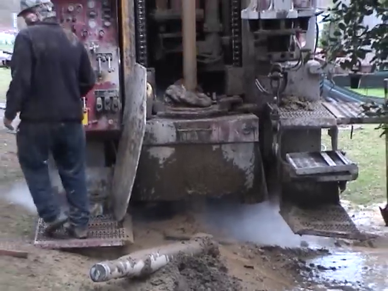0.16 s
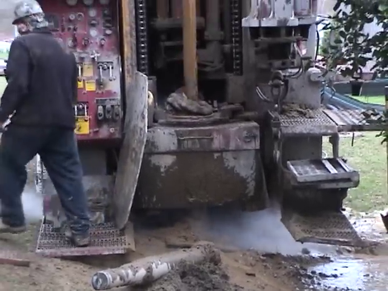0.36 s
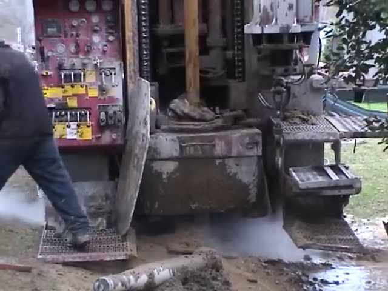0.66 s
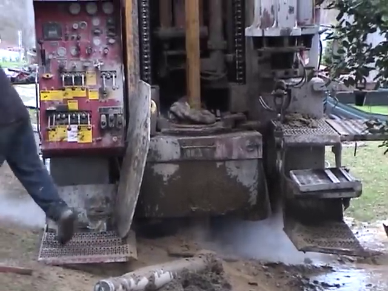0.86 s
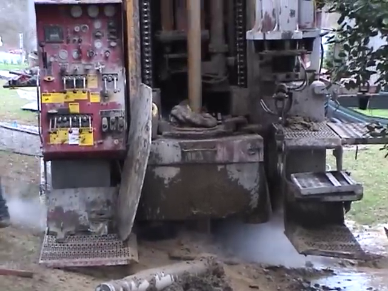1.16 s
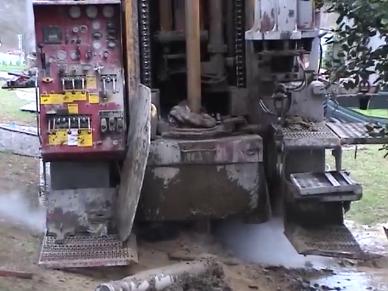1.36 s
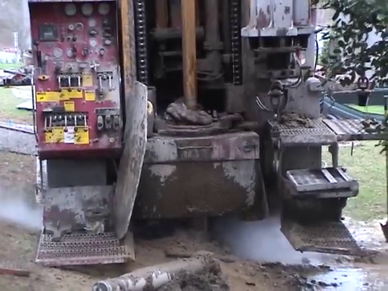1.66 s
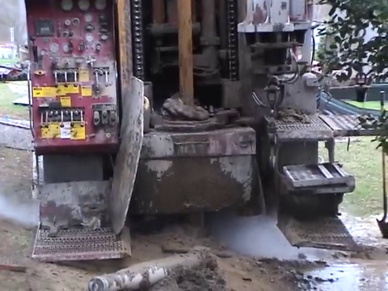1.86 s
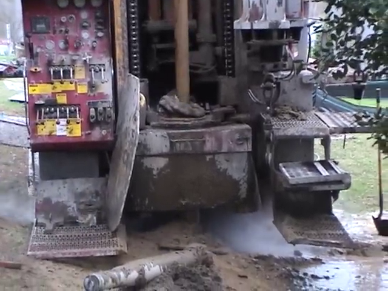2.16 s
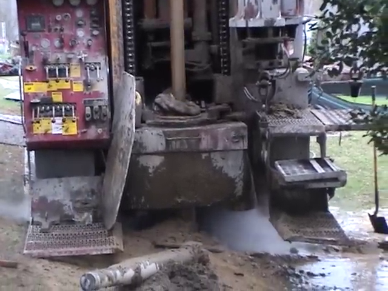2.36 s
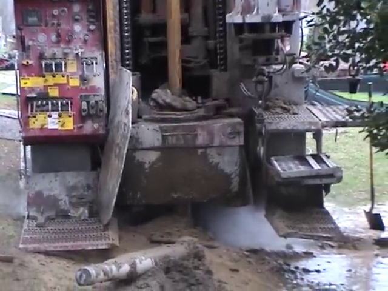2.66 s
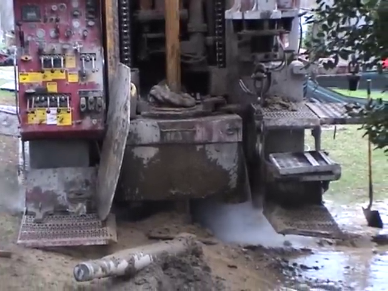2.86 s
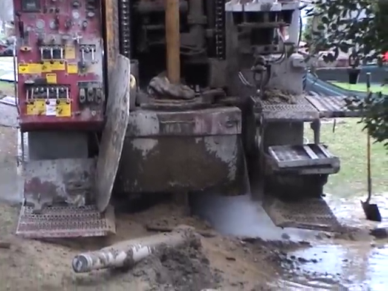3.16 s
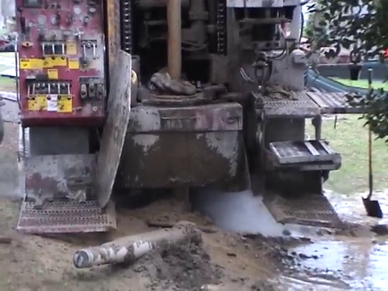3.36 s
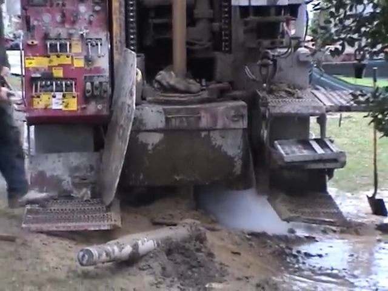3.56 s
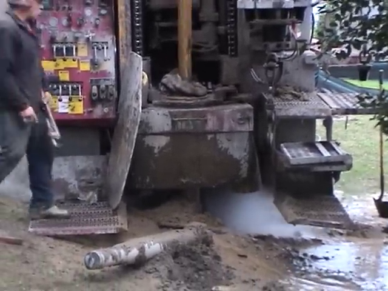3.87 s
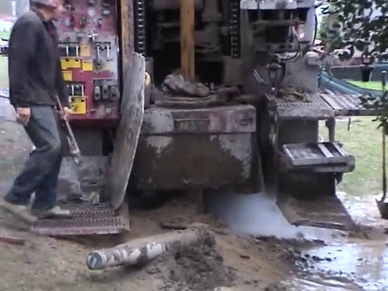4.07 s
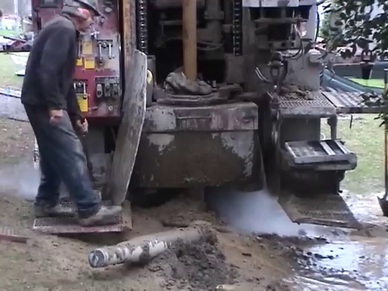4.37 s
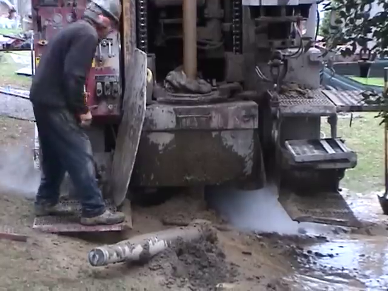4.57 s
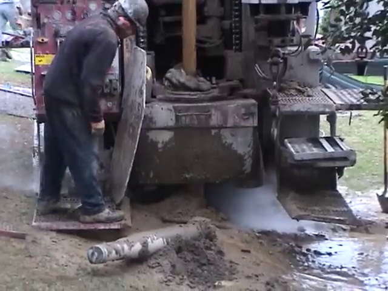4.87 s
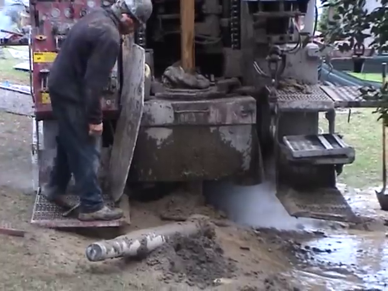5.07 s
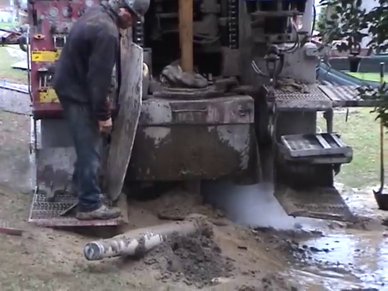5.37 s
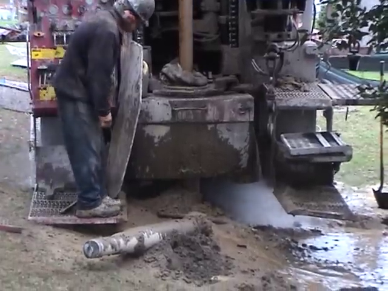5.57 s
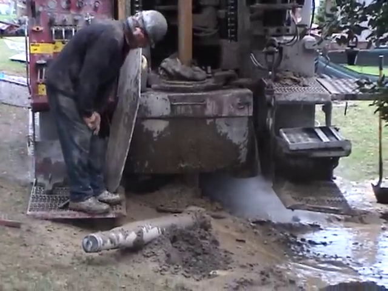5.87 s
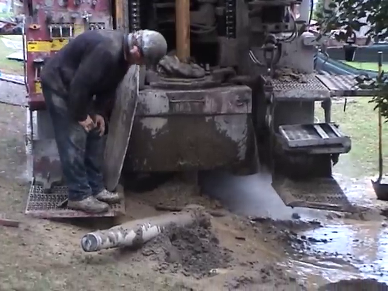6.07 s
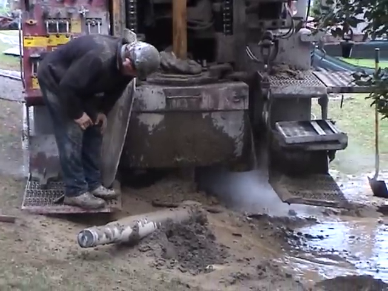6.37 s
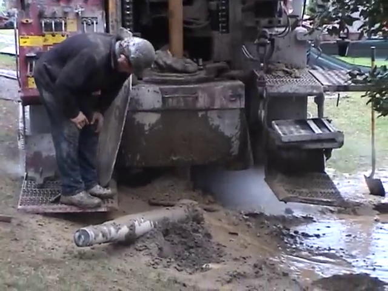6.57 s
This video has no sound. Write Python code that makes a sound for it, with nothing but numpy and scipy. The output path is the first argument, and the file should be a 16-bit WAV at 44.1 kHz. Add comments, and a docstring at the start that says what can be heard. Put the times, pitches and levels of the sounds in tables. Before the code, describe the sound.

Loud, fast steel hammering, over twenty blows a second, with singing pipe tones, blasting air, brief pings and thin squeals, heard on the left only.

```python
"""A truck-mounted rig drills a well with an air hammer that quickens from about 21 to over 22 blows a second.
From the start, bursts of reflections and decaying modes make each blow clank and return as an echo, while
wavering sines keep the pipe singing; shaped noise hisses from the hole over a faint engine sine.
Loose steel pings and resonances swell in spells; squeals soon join as slightly wavering sines, and dull
thuds later as short low pulses. Only the left channel carries sound."""
import sys
import numpy as np
from scipy import signal
from scipy.fft import rfft, irfft, next_fast_len
from scipy.io import wavfile
from scipy.ndimage import uniform_filter1d, minimum_filter1d, map_coordinates

SR = 44100
rng = np.random.default_rng(int(sys.argv[2]) if len(sys.argv) > 2 else 0)


def generate_wav(signal):
    """Clip the signal to [-1, 1] and save it as 16-bit WAV at the path in sys.argv[1]."""
    frames = np.transpose(np.atleast_2d(signal))
    scaled = np.clip(frames, -1, 1) * 32767
    pcm = np.round(scaled).astype(np.int16)
    wavfile.write(sys.argv[1], SR, pcm)


N = 296352
CLOCK_S = np.arange(N) / SR

# All table levels are relative; the functions set the balance between layers.
# hammer speed: time_s, rate_blows_per_s
HAMMER_RATE = [(0, 21.03), (.96, 21.06), (1.2, 20.56), (1.44, 21.22), (2.88, 21.54), (5.76, 22.18),
               (6, 22.01), (6.72, 22.6)]
# clank strength as the bit meets harder and softer rock: time_s, low_clank_db, pipe_ring_db, bright_clank_db
CLANK_LEVELS = [(0.0, -29, -28, -27), (0.21, -23, -21.5, -29.5), (0.3, -29.5, -30.5, -28),
                (0.68, -28.5, -24, -28.5), (0.87, -32, -26, -31), (0.97, -27.5, -22.0, -28.5),
                (1.06, -26.5, -27, -28), (1.35, -29.5, -24, -28.5), (1.54, -26.5, -28, -30),
                (1.73, -28.5, -32, -29.5), (2.01, -28, -24.5, -26), (2.1, -31.5, -29, -26),
                (2.57, -31, -30, -34), (2.76, -25, -28, -26), (3.22, -26, -23, -30.5),
                (3.31, -29.5, -27, -32), (3.5, -31, -28, -27), (3.68, -29, -24.5, -30),
                (3.87, -27, -36, -26.5), (3.96, -26.5, -24, -27.5), (4.32, -30.5, -27.5, -23),
                (4.42, -30.5, -22, -25.5), (4.51, -32.5, -28, -25.5), (4.6, -35, -26, -26.5),
                (4.78, -30, -28.5, -25.0), (5.05, -32.5, -37, -28.5), (5.14, -26.5, -22.5, -28.5),
                (5.24, -35, -34, -21.5), (5.33, -26.5, -24, -27), (5.42, -34.5, -29.0, -25),
                (5.6, -32.5, -30, -24.0), (5.78, -31, -25, -28.5), (6.14, -28.5, -29.5, -27.5),
                (6.23, -34, -32, -29.5), (6.32, -29, -24.5, -26.5), (6.72, -31, -30, -25)]
# blows harder or softer than their neighbours: time_s, low_clank_extra_db, bright_clank_extra_db
ODD_BLOWS = [(0.11, 0.5, 1), (0.49, 3.5, 1.5), (0.59, -0.5, -2.5), (1.16, -4, -3), (1.3, -2, -3.5),
             (1.54, 1, 0.5), (1.59, -4, -3), (1.63, 1.5, -1.0), (1.68, -4, 2.0), (1.87, 3, 1.0),
             (2.15, -0.5, -2), (2.24, 0, 4.5), (2.29, -6.5, -6), (2.34, 2.5, -1), (2.38, -1, -4),
             (2.52, 1.5, 3), (2.62, 0.5, 3), (2.85, -2, -2.5), (2.9, -1.5, 2), (3.13, -1, 4),
             (3.17, -2, 3.5), (3.36, -1.5, -4), (3.45, 1, 2), (3.54, -2.5, -4), (3.68, -0.5, -1.5),
             (3.82, 2.5, 1.5), (4.0, 0.5, 3.5), (4.1, -3, 0.5), (4.64, 2, 0.5), (4.83, 2.5, -2),
             (4.92, 0, 2), (4.96, -4, -8), (5.1, 2, 2.0), (5.24, 3, -5), (5.55, 0, 1), (5.91, -2.5, 0),
             (6.0, 0.0, 3), (6.09, -1, -2), (6.19, 3, -0.5), (6.63, -2.0, 0)]
# second burst of the double low clank: time_s, extra_db
SECOND_PASS_LEVELS = [(0, -1), (2.9, -0.5), (4.6, 3), (5.2, -2.5), (6.72, 0)]
# passes of a blow at the top of the pipe, then its echo: delay_s, gaussian_width_s, level_db
PIPE_PASSES = [(-.0066, .0018, 1.5), (-.0008, .0028, -1), (.021, .005, -7)]
# modes the blows keep ringing in the pipe, low and middle: pitch_hz, level_db
LOW_PIPE_MODES = [(378, -15.5), (585, -7), (600, -7), (693, -9.5), (835, -4.5), (910, -1), (940, -1),
                  (1015, -1)]
MIDDLE_PIPE_MODES = [(1206, -7.5), (1315, -1.5), (1356, 4), (1402, 0), (1458, -1), (1509, 1), (1563, -10),
                     (1615, -5.5), (2065, 0), (2250, -1.5)]
# modes of the frame: pitch_hz, level_db, t60_s
FRAME_MODES = [(2335, -4, .07), (2570, -7, .12), (2780, 6, .0091), (2865, 5, .043), (2930, 1, .06),
               (3070, -12, .18), (3290, -13, .14), (3430, 2.5, .05), (3485, -1, .07), (3620, -6, .09),
               (3745, -9, .11)]
# modes of the steel drill table: pitch_hz, level_db, t60_s
TABLE_MODES = [(3980, 0, .046), (4035, -8, .12), (4140, -5, .067), (4335, -6, .08), (4415, -5, .08),
               (4520, 0, .036), (4785, -10, .11), (4860, -11, .08), (5110, -13, .14), (5280, -6, .055)]
# ringing of the drill table: time_s, level_db
TABLE_LEVELS = [(0.0, -33.5), (0.3, -30), (0.59, -36.5), (0.87, -28.5), (0.97, -37), (1.16, -26.5),
                (1.45, -33.5), (2.01, -29), (2.1, -36), (2.57, -29.5), (3.31, -38), (3.77, -32),
                (4.05, -35), (4.96, -29), (6.59, -35), (6.72, -22)]
# filter responses of the two clanks: frequency_hz, response_db
LOW_CLANK_RESPONSE = [(150, -62), (330, -37), (520, -39), (740, -7.5), (900, 4.5), (1130, -1), (1400, 0),
                      (1900, 5.5), (2300, -18), (3000, -50)]
BRIGHT_CLANK_RESPONSE = [(1200, -14.5), (2000, -1), (2400, 9), (2900, 5.5), (3800, -4), (4300, 2.5),
                         (5300, 1.5), (7000, -16), (12000, -72)]
# two strongest clusters of pipe modes: pitch_hz, level_db
LOWER_TONE_MODES = [(1742, -13), (1759, 0), (1778, -6), (1798, -4)]
UPPER_TONE_MODES = [(1905, -10), (1930, -2), (1955, -7), (1972, 0), (2018, -7)]
# moments when a cluster sings out or sinks: centre_s, half_length_s, extra_db
LOWER_TONE_SURGES = [(-0.0, 0.04, -1), (0.15, 0.027, -4.0), (0.287, 0.03, -4.5), (0.62, 0.19, 2),
                     (1.431, 0.024, -5), (1.62, 0.06, -1), (2.012, 0.13, 4.0), (2.449, 0.05, -8),
                     (2.52, 0.046, 3.5), (2.783, 0.067, -12), (3.147, 0.083, 3), (3.491, 0.07, -4.5),
                     (3.623, 0.033, 4.0), (4.148, 0.098, 3.5), (4.48, 0.067, -13), (4.543, 0.29, 7.5),
                     (4.777, 0.03, -10.5), (4.867, 0.073, 5.5), (5.81, 0.03, 5), (5.89, 0.03, -4),
                     (6.225, 0.13, -6.5), (6.55, 0.08, 1.5)]
UPPER_TONE_SURGES = [(0.03, 0.21, 1.5), (0.33, 0.091, -4.5), (0.84, 0.07, -8), (1.12, 0.3, 4.5),
                     (1.48, 0.21, -6), (1.89, 0.039, -11), (2.4, 0.07, 3), (2.52, 0.04, -10),
                     (2.84, 0.061, -9), (2.96, 0.11, 3), (3.27, 0.052, 4.5), (3.91, 0.037, -7),
                     (4.07, 0.085, 3.5), (4.57, 0.03, -8), (4.791, 0.037, -10), (4.95, 0.062, -5),
                     (5.27, 0.09, -4), (5.63, 0.04, -4), (5.76, 0.082, 4), (5.9, 0.049, -9),
                     (6.14, 0.14, 3.0), (6.2, 0.06, -5)]
# chatter of the pipe in its guide: time_s, level_db
CHATTER_LEVELS = [(0, -34.5), (.28, -36), (.5, -34), (1.5, -34), (2.05, -36.5), (2.52, -31.5), (2.75, -37),
                  (3.25, -39), (3.5, -30.5), (3.92, -36.5), (4.34, -35.5), (4.6, -32), (5.04, -33.5),
                  (5.6, -32.5), (6.72, -33)]
# blows that chatter harder: time_s, extra_db
CHATTER_ACCENTS = [(0.287, 8.5), (0.334, 9), (0.381, 7), (0.77, 4), (3.545, 3), (4.49, 3), (4.54, 3.5),
                   (6.58, 3), (2.465, 3), (4.814, 5), (4.953, 9), (5.043, 11.5), (5.904, 7), (6.222, 7.5)]
# filter response of the rasp: frequency_hz, response_db
RASP_RESPONSE = [(3500, 3.5), (5300, 0.5), (7200, 9.5), (7600, 6), (8100, 2.5), (9400, 6), (10000, -4.5),
                 (11500, -1), (12300, -28), (14500, -39)]
# thin high pipe modes: pitch_hz, level_db
SHRILL_MODES = [(5500, -52), (5566, -46), (5640, -52), (5870, -51), (5954, -43), (6062, -47), (6180, -54),
                (6331, -48), (6440, -51), (6530, -51), (6590, -54), (6675, -47), (6820, -51), (6912, -46.5),
                (7020, -45.5), (7284, -47), (7388, -43.5), (7425, -48), (7705, -56), (7820, -55),
                (8570, -56), (8642, -53), (8800, -58), (8975, -53), (9270, -56), (9340, -50.5), (9450, -56),
                (9610, -57), (9830, -60), (11520, -60)]
# air and spray leaving the hole: time_s, level_db
AIR_LEVELS = [(0, -25), (2.17, -26), (2.55, -24.5), (3.1, -26.5), (3.6, -24.5), (4.08, -26), (5.03, -25.5),
              (6.72, -26.5)]
# noise spectra of the rush and of the whistle at the gap: frequency_hz, response_db
RUSH_SPECTRUM = [(25, -17), (70, -34), (130, -21), (300, -15), (420, -7.5), (900, -1.5), (2500, 2),
                 (4500, 1), (6800, -3), (8200, -10.5), (9400, -9), (10500, -14), (13000, -18), (15500, -38)]
WHISTLE_SPECTRUM = [(11000, -50), (12550, -17), (12780, 1), (13000, -17), (14500, -50)]
# pings of a loose steel part: start_s, level_db
PING_EVENTS = [(0.004, -20), (0.053, -19), (0.244, -20), (0.53, -21), (0.772, -16), (0.915, -20),
               (0.962, -20), (1.01, -19), (1.057, -20), (1.102, -13), (1.155, -12), (1.202, -10),
               (1.395, -15), (1.488, -13), (3.075, -24), (3.12, -24), (4.27, -19), (6.58, -21)]
# modes of that part: pitch_hz, level_db, t60_s
PING_MODES = [(4007, -6.5, 0.065), (5230, -8, 0.082), (5330, -1, 0.075)]
# spells of one steelwork resonance driven hard: centre_s, gaussian_width_s, pitch_hz, level_db
RESONANCE_SPELLS = [(.03, .062, 2890, -31), (.02, 0.027, 4540, -27), (.36, .14, 4000, -34),
                    (1.099, 0.0418, 2780, -26), (.8, 0.11, 3430, -29), (1.193, .11, 3975, -31),
                    (1.45, .08, 3440, -31), (1.3, 0.303, 690, -39.5), (1.84, .2, 4000, -26.5),
                    (1.948, 0.224, 3440, -27), (2.234, .04, 2810, -26), (2.238, 0.022, 3560, -29),
                    (2.62, .17, 4030, -25.5), (3.1, 0.068, 4010, -28), (2.598, .084, 4360, -41),
                    (2.76, .04, 3316, -26), (2.851, .12, 1056, -31), (2.928, .1, 1320, -26),
                    (2.97, .1, 1205, -34), (3.622, .2, 3460, -27.5), (3.767, 0.0396, 3925, -30),
                    (3.802, 0.045, 4500, -26), (3.86, 0.046, 3480, -29), (4.25, .2, 2870, -32),
                    (4.418, 0.113, 2950, -26), (4.862, .13, 2940, -28), (5, .1, 3600, -29),
                    (5.319, 0.058, 4890, -32), (5.55, .12, 2950, -30), (6.23, 0.071, 3180, -30),
                    (6.23, .08, 3650, -28), (6.667, .1, 2910, -23)]
# squeals of the turning pipe in its guide: start_s, end_s, pitch_hz, level_db
SQUEAL_EVENTS = [(.1, .3, 11843, -50), (.25, .45, 10357, -48), (.25, .44, 7816, -38), (.25, .44, 8979, -41),
                 (.72, .9, 7388, -35), (1.33, 1.5, 7405, -34), (1.44, 1.72, 5950, -35),
                 (1.45, 1.58, 6330, -38), (2.3, 2.52, 7405, -35), (2.44, 2.72, 5950, -35),
                 (2.48, 2.66, 6675, -32), (3.36, 3.56, 6675, -30), (3.42, 3.6, 5570, -35),
                 (3.5, 3.62, 9345, -38), (3.67, 3.83, 5950, -34), (4.58, 4.63, 4155, -25),
                 (4.68, 4.82, 4135, -30), (4.86, 5.13, 4030, -27.5), (4.86, 4.95, 10250, -41),
                 (5.01, 5.1, 3617, -30), (5.13, 5.48, 4120, -33), (5.5, 5.62, 4150, -30),
                 (5.54, 5.75, 5572, -36), (5.72, 5.85, 4155, -31), (5.66, 5.95, 4040, -33),
                 (5.98, 6.32, 4035, -29), (6.1, 6.6, 4130, -33), (6.3, 6.68, 7020, -34),
                 (6.62, 6.74, 4155, -28)]
# dull thuds: start_s, level_db, pulse_time_constant_s
THUD_EVENTS = [(3.167, -31, .00042), (4.18, -39, .0004), (4.363, -41, .0005), (4.55, -38.5, .00055),
               (5.364, -34.5, .00038), (5.73, -46, .0006), (5.82, -35.5, .00044), (5.955, -47, .0007),
               (6.045, -44, .0006), (6.314, -35.5, .00038), (6.449, -36.5, .00038)]

ECHO_S = 0.029  # return of each blow along the pipe
LOWER_DB, UPPER_DB = -28.5, -26.8  # usual relative level of the two strongest pipe tones
SPELL_T60_S, SPELL_DETUNE_HZ = 0.1, 27.6  # ring time; scatter of pitch from blow to blow
ENGINE_HZ = 89
LIMIT, TOP_HZ = .88, 15650  # limiter peak amplitude; top of the passed band


def amp(db):
    """Level law: decibels become an amplitude gain."""
    return 10 ** (np.asarray(db) / 20)


def unit(x):
    """Normalization: x is scaled to an rms of 1."""
    return x / np.sqrt(np.mean(x ** 2) + 1e-20)


def curves(rows):
    """Linear interpolation: one value per sample for each column after the time."""
    s, *cols = np.transpose(rows)
    return [np.interp(CLOCK_S, s, c) for c in cols]


def bump(centre, half, power=2):
    """Bell law: a smooth rise to 1 and fall, at 1/e a half length (s) from the centre."""
    return np.exp(-((CLOCK_S - centre) / half) ** power)


def wobble(rate):
    """Band-limited fluctuation: a smooth curve through random knots, rate of them a second."""
    knots = rng.standard_normal(int(N * rate / SR) + 4)
    return map_coordinates(knots, [np.arange(N) * rate / SR])


def filtered(x, response):
    """Linear filtering: the spectrum of x is multiplied by a function of frequency."""
    m = next_fast_len(N + SR // 2)
    return irfft(rfft(x, m) * response(np.fft.rfftfreq(m, 1 / SR)), m)[..., :N]


def coloured(x, points):
    """Spectral shaping: x passes a response drawn over log frequency and leaves at rms 1."""
    f, db = np.transpose(points)

    def response(hz):
        inside = np.interp(np.log(hz + 1), np.log(f), db)
        above = 40 * np.log(np.maximum(hz / f[-1], 1))
        below = 10 * np.log(np.maximum(f[0] / (hz + 1), 1))
        return amp(inside - above - below)

    return unit(filtered(x, response))


def steady(x, size):
    """Automatic gain: swells longer than size samples are evened out."""
    power = uniform_filter1d(uniform_filter1d(x ** 2, size), size)
    return x / np.sqrt(np.abs(power) + 1e-9)


def laid(times, bursts):
    """Superposition: one row of bursts starts at each time, and the sum has rms 1."""
    # a second of padding admits bursts that start before time zero
    at = np.round(times[:, None] * SR).astype(int) + np.arange(bursts.shape[1]) + SR
    return unit(np.bincount(at.ravel(), bursts.ravel(), N + SR)[SR:N + SR])


def rattle(times, lead, rise, decay, tail, alike, scatter_db):
    """Dense reflections: noise bursts decay; their pattern partly repeats and drifts as the pipe turns."""
    t = np.arange(SR // 10) / SR
    shape = (1 - np.exp(-(t / rise) ** 2)) * np.hypot(np.exp(-t / decay), tail * np.exp(-t / 0.084))
    fresh = rng.standard_normal((len(times), len(t)))
    before = alike * rng.standard_normal((1, len(t)))
    # recursion from blow to blow, separately at each sample of the burst
    pattern = signal.lfilter([np.sqrt(1 - alike ** 2)], [1, -alike], fresh, axis=0, zi=before)[0]
    strength = amp(scatter_db * rng.standard_normal((len(times), 1)))
    return laid(times - lead, pattern * shape * strength)


def struck(times, modes, lead, rise, scatter_db):
    """Modal excitation: each blow rings decaying modes anew, at fresh strengths and phases."""
    hz, db, t60 = np.transpose(modes)
    t = np.arange(SR // 4) / SR
    rings = amp(-60 * t / t60[:, None]) * np.exp(2j * np.pi * hz[:, None] * t)
    rings = rings * (1 - np.exp(-(t / rise) ** 2))
    size = (len(times), len(hz))
    # the turning pipe favours other modes from moment to moment
    turning = unit(uniform_filter1d(rng.standard_normal(size), size=4, axis=0))
    strength_db = db + scatter_db * (1.35 * turning + 1.15 * rng.standard_normal(size))
    gains = amp(strength_db) * np.exp(2j * np.pi * rng.random(size))
    return laid(times - lead, (gains @ rings).real)


def ringing(modes, waver_hz, sway_db):
    """Sustained modes: sines that never stop waver in pitch and strength, and beat together."""
    def drift(count):
        return np.interp(CLOCK_S, np.linspace(0, N / SR, count), rng.standard_normal(count))

    total = np.zeros(N)
    for hz, db in modes:
        level = amp(db + sway_db * drift(count=50))
        phase = 2 * np.pi * np.cumsum(hz + waver_hz * drift(count=150)) / SR
        total += level * np.sin(phase)
    return unit(total)


def passing(times, between_db, scatter_db):
    """Travelling energy: a short crest for every pass of a blow at the pipe top, a lower ring between."""
    t = np.arange(SR // 12) / SR - .02
    crests = np.array([amp(db) * np.exp(-((t - delay) / width) ** 2 / 2) for delay, width, db in PIPE_PASSES])
    strength = amp(scatter_db * rng.standard_normal((len(times), len(PIPE_PASSES))))
    power = strength ** 2 @ crests ** 2
    return unit(np.sqrt(laid(times + t[0], power) + amp(between_db) ** 2))


def blow_times():
    """Periodic impact: the piston strikes, with slight jitter, at each whole number of cycles."""
    cycles = np.cumsum(curves(HAMMER_RATE)[0]) / SR - .35
    times = np.interp(np.arange(int(cycles[-1]) + 1), cycles, CLOCK_S)
    return times + rng.normal(0, .0005, len(times))


def clank(times):
    """Dispersion: bending waves run faster at high pitch, so the bright clank leads the low double one."""
    low_db, pipe_db, bright_db = curves(CLANK_LEVELS)
    odd_low_db = sum(low * bump(s, .024, power=4) for s, low, bright in ODD_BLOWS)
    odd_bright_db = sum(bright * bump(s, .024, power=4) for s, low, bright in ODD_BLOWS)
    first = rattle(times, lead=.0086, rise=0.0014, decay=0.004, tail=0.05, alike=0.7, scatter_db=.8)
    second = rattle(times, lead=.0018, rise=0.002, decay=0.0038, tail=0.05, alike=0.7, scatter_db=1.5)
    echo = rattle(times + ECHO_S, lead=0.0055, rise=0.0037, decay=0.011, tail=0.041, alike=0.6, scatter_db=2)
    passes = first + amp(curves(SECOND_PASS_LEVELS)[0] - 4.5) * second + amp(-6) * echo
    body = amp(-0.5) * coloured(passes, LOW_CLANK_RESPONSE)

    drone = amp(-9.0) * ringing(LOW_PIPE_MODES, waver_hz=5.97, sway_db=3.5)
    drone = drone * passing(times + 0.002, between_db=-4.5, scatter_db=4.0)
    pipe = steady(ringing(MIDDLE_PIPE_MODES, waver_hz=9.04, sway_db=4), size=2600)
    pipe = amp(pipe_db - 3.0) * pipe * passing(times, between_db=-5.5, scatter_db=3)

    crack = rattle(times, lead=.0103, rise=0.0015, decay=0.0072, tail=0.15, alike=0.7, scatter_db=1.3)
    frame = amp(-4.5) * coloured(crack, BRIGHT_CLANK_RESPONSE)
    frame = frame + amp(-3.5) * struck(times, FRAME_MODES, lead=0.0115, rise=0.003, scatter_db=2.5)
    table = struck(times, TABLE_MODES, lead=.012, rise=0.0042, scatter_db=2)
    table = amp(curves(TABLE_LEVELS)[0] + .2) * table

    low = amp(odd_low_db) * (amp(low_db) * (body + drone) + pipe)
    bright = amp(odd_bright_db) * (amp(bright_db) * frame + table)
    return low + bright


def pipe_tones(times):
    """Beating: blows keep two clusters of close pipe modes singing, which throb with every pass."""
    out = np.zeros(N)
    for modes, mean_db, surges in [(LOWER_TONE_MODES, LOWER_DB, LOWER_TONE_SURGES),
                                   (UPPER_TONE_MODES, UPPER_DB, UPPER_TONE_SURGES)]:
        tone = ringing(modes, waver_hz=10.5, sway_db=5)
        tone = steady(tone * passing(times, between_db=-3.5, scatter_db=2.5), size=2600)
        surge_db = sum(db * bump(s, half) for s, half, db in surges)
        out += amp(mean_db + surge_db) * tone
    return out


def chatter(times):
    """Steel contact at the guide: a rasp heads each blow, and thin high modes hang on."""
    rasp = rattle(times, lead=.0185, rise=0.0028, decay=0.018, tail=0.32, alike=0.8, scatter_db=1.9)
    modes = [(hz, db, .25) for hz, db in SHRILL_MODES]  # t60 of .25 s
    ring = steady(struck(times, modes, lead=.016, rise=.005, scatter_db=1.2), size=7000)
    accent_db = sum(db * bump(s, .02) for s, db in CHATTER_ACCENTS)
    rasp = amp(accent_db - 2.5) * coloured(rasp, RASP_RESPONSE)
    ring = amp(accent_db / 2 + 2.15) * ring
    return amp(curves(CHATTER_LEVELS)[0]) * (rasp + ring)


def spray():
    """Flow noise: air and wet cuttings rush out unevenly, with a thin whistle at the gap."""
    flow = amp(curves(AIR_LEVELS)[0] + .5 * wobble(7) + 1.9 * wobble(170))
    rush = coloured(rng.standard_normal(N), RUSH_SPECTRUM)
    whistle = coloured(rng.standard_normal(N), WHISTLE_SPECTRUM)
    return flow * (amp(-1.9) * rush + amp(-27.5) * whistle)


def engine():
    """Periodic firing: the diesel's note is one sine, nearly steady in pitch and level."""
    phase = 2 * np.pi * np.cumsum(ENGINE_HZ + 0.16 * wobble(2.9)) / SR
    return amp(-60.5 + 0.57 * wobble(4.8)) * np.sin(phase)


def pings():
    """Free vibration: each ping of a loose part rings the same few decaying modes at new strengths."""
    out, t = np.zeros(N + SR), np.arange(SR // 5) / SR
    for s, db in PING_EVENTS:
        ring = np.zeros(len(t))
        for hz, level, t60 in PING_MODES:
            ring += amp(level + rng.normal(0, 2.4) - 60 * t / t60) * np.sin(2 * np.pi * hz * t)
        onset = 1 - np.exp(-t / 0.0032)
        out[round(s * SR):][:len(t)] += amp(db) * ring * onset
    return out[:N]


def spells(times):
    """Forced resonance: one steelwork mode after another swells up under the blows and fades again."""
    out, t = np.zeros(N + SR), np.arange(SR // 8) / SR
    for s, width, hz, db in RESONANCE_SPELLS:
        near = (abs(times - s) < 2 * width) & (times > .01)
        for start in times[near] - .01:
            detune, phase = rng.standard_normal(2)
            swell = np.exp(-((start - s) / width) ** 2 / 2)
            ring = np.sin(2 * np.pi * ((hz + SPELL_DETUNE_HZ * detune) * t + phase))
            onset = 1 - np.exp(-(t / 0.0024) ** 2)
            out[round(start * SR):][:len(t)] += swell * amp(db + 6 - 60 * t / SPELL_T60_S) * ring * onset
    return out[:N]


def squeals():
    """Friction excitation: rubbing holds one mode singing, wavering slightly in pitch and in strength."""
    warped_s = np.cumsum(1 + .004 * wobble(30)) / SR
    flutter = amp(3 * wobble(40))
    out = np.zeros(N)
    for start, end, hz, db in SQUEAL_EVENTS:
        across = 2 * (CLOCK_S - start) / (end - start) - 1  # -1 at the start, 1 at the end
        swell = np.sqrt(np.maximum(0, 1 - across ** 2))
        out += amp(db) * swell * np.sin(2 * np.pi * hz * warped_s)
    return flutter * out


def thuds():
    """Low pulses: short dull thumps at some blows swing once each way, without any ring."""
    out = np.zeros(N)
    for s, db, pulse_s in THUD_EVENTS:
        v = np.clip((CLOCK_S - s) / pulse_s, 0, 50)
        out += amp(db + 13.5) * v * (2 - v) * np.exp(-v)
    return out


def scene():
    """Superposition: all sounds of the rig add up, on the left channel alone."""
    times = blow_times()
    steel = clank(times) + spells(times) + pipe_tones(times) + chatter(times) + pings()
    rig = steel + spray() + engine() + thuds() + squeals()
    return np.array([2 * rig, np.zeros(N)])


def record(dry):
    """Peak limiting and band limiting: a fast gain holds the highest peaks, then a sharp low-pass acts."""
    needed = np.minimum(1, LIMIT / (np.abs(dry).max(axis=0) + 1e-9))
    gain = uniform_filter1d(minimum_filter1d(needed, size=161), size=161)
    return filtered(dry * gain, lambda hz: hz < TOP_HZ)


dry = scene()
out = record(dry)
generate_wav(out)
```